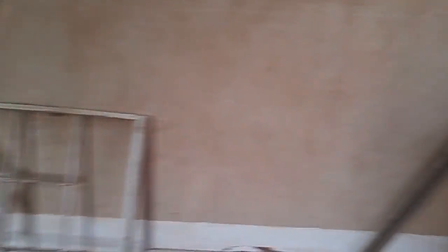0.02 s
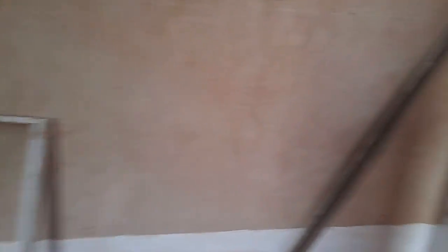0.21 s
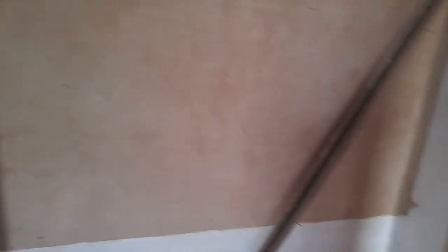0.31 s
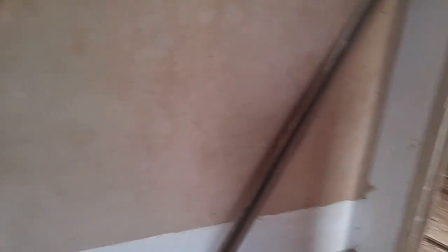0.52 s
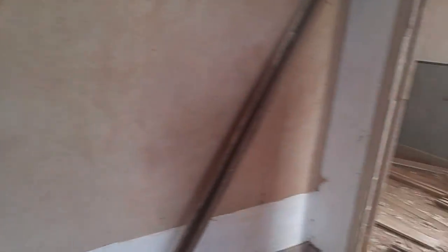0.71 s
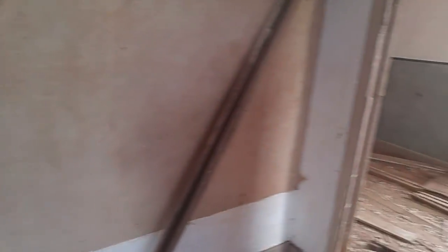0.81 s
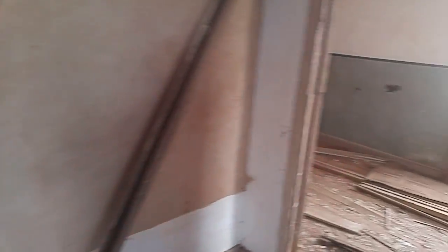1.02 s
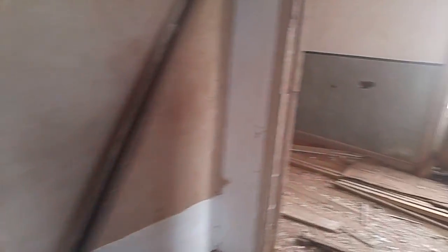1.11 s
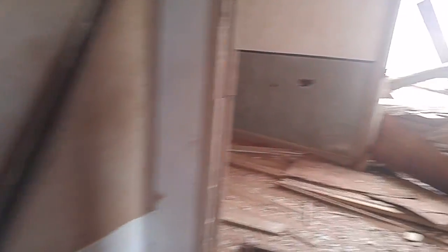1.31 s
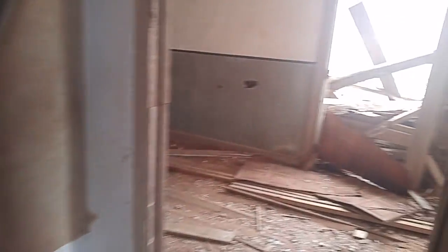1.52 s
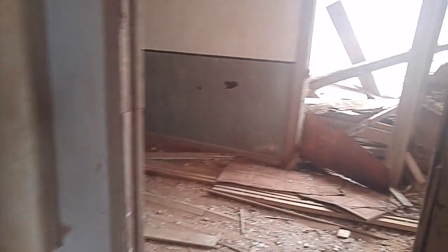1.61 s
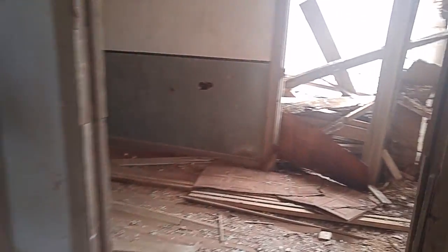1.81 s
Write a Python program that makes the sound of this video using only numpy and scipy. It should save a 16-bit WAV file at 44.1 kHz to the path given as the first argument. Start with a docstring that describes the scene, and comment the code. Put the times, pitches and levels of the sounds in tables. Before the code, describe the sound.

Two footsteps on loose boards and crumbled plaster: first a loud wooden clatter with sharp crunches, then sparse grit ticks, then a softer, duller step, in a bare echoing room, close hand-held stereo microphone.

```python
"""Two footsteps in a ruined room

Two steps on plaster rubble and loose boards in a bare room, heard by a hand-held camera.
Boards knock and rattle (decaying tones), plaster crunches (dense clicks) and snaps (noise bursts),
joists thud (resonated noise and low tones). Between the steps a few bits of grit crack as the foot
lifts. Bare walls ring after boards, crunch and snaps (sparse decaying taps); still air lies beneath."""
import sys
import numpy as np
from scipy import signal
from scipy.fft import rfft, irfft
from scipy.io import wavfile
from scipy.ndimage import uniform_filter1d

SR = 44100
rng = np.random.default_rng(int(sys.argv[2]) if len(sys.argv) > 2 else 0)


def nominal_scale(level):
    """Amplitude ratio for a level in decibels (scalar or array-like)."""
    x = np.asarray(level, float) / 20
    return 10 ** x


def materialize(psi):
    """Save the field psi as 16-bit PCM at rate SR to the path in sys.argv[1].

    A 1-D psi becomes a single channel; in a 2-D psi each row is a channel.
    """
    bounded = np.clip(np.atleast_2d(psi).T, -1, 1)
    quanta = np.round(bounded * 32767).astype(np.int16)
    wavfile.write(sys.argv[1], SR, quanta)


N = 83790
T = np.arange(N) / SR


def evened(x):
    """Scale to rms 1."""
    return x / np.sqrt(np.mean(x ** 2) + 1e-20)


def read(points, hz):
    """Interpolate (frequency, value) points over log frequency."""
    f, value = np.transpose(points)
    return np.interp(np.log(hz + 1), np.log(f + 1), value)


def curve(table, column):
    """One column of a table over time."""
    rows = np.array(table)
    return np.interp(T, rows[:, 0], rows[:, column])


def colour(x, points):
    """Causal minimum-phase filter with the given gain curve."""
    gain_db = read(points, np.abs(np.fft.fftfreq(4096, 1 / SR)))
    log_gain = np.log(nominal_scale(np.maximum(gain_db, -100)))
    phase = -signal.hilbert(log_gain).imag
    taps = np.fft.ifft(np.exp(log_gain + 1j * phase)).real[:2048]
    taps = taps.reshape((1,) * (x.ndim - 1) + (-1,))
    return signal.oaconvolve(x, taps, axes=-1)[..., :N]


def resonate(x, hz, width_hz):
    """One-pole complex resonator: a single damped mode."""
    r = np.exp(-np.pi * width_hz / SR)
    turn = np.exp(2j * np.pi * hz / SR)
    return 2 * signal.lfilter([1 - r], [1, -r * turn], x + 0j).real


def ring(hz, t60_s, lag_s):
    """Short decaying tone of energy 1, reaching the two ports with a lag."""
    t = np.maximum(T[:4000] - np.maximum([[lag_s], [-lag_s]], 0), 0)
    rise = np.minimum(t * hz, 1)
    out = nominal_scale(-60 * t / t60_s) * np.sin(2 * np.pi * hz * t) * rise
    return out / np.linalg.norm(out[0])


def clicks(per_s, spread_db, shape):
    """Sparse clicks of random sign, a few of them large."""
    size_db = spread_db * np.minimum(rng.exponential(1, shape), 4)
    size = nominal_scale(size_db) * rng.choice([-1., 1.], shape)
    return evened(size * (rng.random(shape) < per_s / SR))


# decay of the wall ring: (frequency [Hz], t60 [s])
WALL_DECAY = [(100, 0.52), (400, 0.43), (1000, 0.4), (3000, 0.42), (8000, 0.26), (14000, 0.25)]
# likeness of the ring at both ports: (frequency [Hz], likeness [0..1])
WALL_LIKENESS = [(100, 0.62), (500, 1), (1000, 0.2), (2000, 0.084), (8000, 0.088)]


def tail():
    """Wall echoes: sparse taps of random sign, each band dying at its own speed."""
    taps = np.zeros((2, SR))
    at = np.arange(200, SR - 20, 20) + rng.integers(0, 20, (2, (SR - 201) // 20))
    np.put_along_axis(taps, at, rng.choice([-1., 1.], at.shape), 1)
    hz, t, z = signal.stft(taps, SR, nperseg=256)
    like = np.clip(read(WALL_LIKENESS, hz), 0, 1)[:, None]
    z[1] = like * z[0] + np.sqrt(1 - like ** 2) * z[1]
    decay = nominal_scale(-60 * t / read(WALL_DECAY, hz)[:, None])
    out = signal.istft(z * decay, SR, nperseg=256)[1][:, :SR // 2]
    out[:, :200] = 0
    return out / np.linalg.norm(out[0])


def room(x, wet_db):
    """Direct sound plus wall ring; the mix of two tails turns at 7 Hz, a new spot for each sound."""
    x = x * np.ones((2, 1))
    turn = 2 * np.pi * 7 * T
    weights = (np.sin(turn), np.cos(turn))
    wet = sum(signal.fftconvolve(x * w, tail(), axes=1)[:, :N] for w in weights)
    return x + nominal_scale(wet_db) * wet


# colour of the still air: (frequency [Hz], relative level [dB])
AIR_COLOUR = [(24, -41), (40, -11), (71, -6.5), (99, 0), (256, -16), (392, -7.5), (516, -24), (600, -10),
              (715, -5.5), (942, -14), (1150, -13.5), (1590, -28), (1720, -38), (2910, -40), (6650, -44),
              (8340, -31), (16000, -41)]
# left-right likeness of the air: (frequency [Hz], likeness [-1..1])
AIR_LIKENESS = [(60, 0.76), (180, 0.89), (550, 0.78), (1650, 0), (4970, -0.0), (15000, 0.01)]
AIR_DB, AIR_PATCH_DB = -60, 0.81


def air():
    """Still air of the ruin: steady faint coloured noise with slight patches in time and frequency."""
    frames, hz = N // 512 + 6, np.fft.rfftfreq(2048, 1 / SR)
    a, b, c, d, patches = rng.standard_normal((frames, 1025, 5)).T
    patches = evened(uniform_filter1d(uniform_filter1d(patches, 20, 0), 6, 1))
    same = np.clip(read(AIR_LIKENESS, hz), -1, 1)[:, None]
    left = a + 1j * b
    right = same * left + np.sqrt(1 - same ** 2) * (c + 1j * d)
    z = np.array([left, right]) * nominal_scale(read(AIR_COLOUR, hz)[:, None] + AIR_PATCH_DB * patches)
    noise = signal.istft(z, nperseg=2048, noverlap=1536)[1][:, 1024:N + 1024]
    return nominal_scale(AIR_DB) * evened(noise)


# rumble of joists and planks: (time [s], relative joist level [dB], relative plank level [dB])
RUMBLE = [(0.0, -83, -84), (0.164, -74, -75), (0.322, -41, -33.5), (0.39, -45, -58.5), (0.412, -54, -52),
          (0.476, -56, -55), (0.512, -53, -64), (0.57, -56, -43), (0.602, -46, -39.5), (0.65, -53.5, -58.5),
          (0.718, -50.5, -57.5), (0.798, -54, -48.5), (0.836, -83, -55), (0.894, -50, -53),
          (1.036, -67, -68), (1.168, -60, -61), (1.206, -52.5, -54.5), (1.38, -61, -75), (1.45, -78, -73),
          (1.508, -45, -36.5), (1.534, -41, -38.5), (1.592, -49, -39.5), (1.83, -48, -61.5),
          (1.9, -77, -68)]
JOIST_HZ, JOIST_WIDTH_HZ, PLANK_HZ, PLANK_WIDTH_HZ = 52, 11.4, 134, 172
# low thumps of the floor: (time [s], level before rise and decay [dB], frequency [Hz], t60 [s])
FLOOR_THUMPS = [(.262, -45, 100, .15), (.305, -37, 52, 0.33), (.31, -43, 150, .1), (.355, -40, 55.5, 0.27),
                (.575, -41.5, 150, .12), (.595, -43, 50, .3), (.60, -46, 110, .1), (.70, -51, 50, .3),
                (.785, -47, 100, .1), (.89, -52, 58, .2), (1.155, -56, 50, .2), (1.192, -46, 100, 0.18),
                (1.25, -56, 55, 0.23), (1.497, -36, 69.6, 0.24), (1.51, -42, 130, .12),
                (1.575, -45, 110, 0.13), (1.625, -38, 60, 0.26), (1.72, -42, 48, 0.34), (1.81, -49, 52, .2)]
THUMP_RISE_CYCLES = 1


def thuds():
    """Body weight pushing joists and planks: resonated noise plus single decaying low tones."""
    a, b = rng.standard_normal((2, N))
    joist = resonate(resonate(a, JOIST_HZ, JOIST_WIDTH_HZ), JOIST_HZ, JOIST_WIDTH_HZ)
    plank = resonate(resonate(b, PLANK_HZ, PLANK_WIDTH_HZ), PLANK_HZ, PLANK_WIDTH_HZ)
    out = evened(joist) * nominal_scale(curve(RUMBLE, 1) - 4)
    out += evened(plank) * nominal_scale(curve(RUMBLE, 2) - 2)
    for s, level_db, hz, t60_s in FLOOR_THUMPS:
        t = np.maximum(T - s, 0)
        rise = np.minimum(t * hz / THUMP_RISE_CYCLES, 1)
        out += nominal_scale(level_db - 60 * t / t60_s) * rise * np.sin(2 * np.pi * hz * t)
    return out


# crunch of fine plaster under the sole: (time [s], relative level [dB])
CRUNCH_LEVEL = [(0.225, -75), (0.257, -33), (0.285, -37), (0.299, -27), (0.405, -43), (0.419, -45),
                (0.461, -56), (0.467, -21.5), (0.513, -51.5), (0.573, -40.5), (0.593, -36), (0.625, -45),
                (0.685, -44), (0.699, -44), (0.737, -48), (1.035, -68), (1.045, -41), (1.119, -78),
                (1.157, -49.5), (1.165, -44), (1.193, -54), (1.333, -85), (1.497, -50), (1.525, -36.5),
                (1.557, -50), (1.581, -36), (1.819, -74.5), (1.829, -53), (1.871, -94), (1.9, -72)]
# colour of grit, also of bright snaps: (frequency [Hz], relative level [dB])
GRIT_COLOUR = [(880, -37.5), (1500, -9), (1740, -3), (2690, -12.5), (4460, -11.5), (5710, -8), (6760, -8.5),
               (8490, -1.5), (10000, -7), (10800, -10), (12400, -14.5), (15200, -22), (16000, -18)]
GRAINS_PER_S, GRAIN_SPREAD_DB, GRIT_WET_DB = 5600, 2.5, -0.5


def crunch():
    """Fine plaster crushed left and right of the sole: dense tiny grains as coloured clicks."""
    grains = clicks(GRAINS_PER_S, GRAIN_SPREAD_DB, (2, N))
    grains = evened(colour(grains + 0.1 * grains[::-1], GRIT_COLOUR))
    return room(grains * nominal_scale(curve(CRUNCH_LEVEL, 1) - 3.5), GRIT_WET_DB)


# plaster snaps: (time [s], relative level [dB], dull part re bright [dB],
# left minus right, held within 8 [dB], t60 [s], favoured pitch [Hz], rise [s])
PLASTER_SNAPS = [(0.2585, -25, -21, -1, 0.018, 3140, 0.0011), (0.2642, -22.5, 11, -1, 0.025, 6400, 0.0013),
                 (0.2895, -23, -19, 0, 0.018, 7340, 0.0011), (0.298, -15, -7, -8, 0.031, 7170, 0.0011),
                 (0.3053, -10, -31, -0.5, 0.016, 7400, 0.00073),
                 (0.4155, -20, -23, -19.5, 0.025, 5370, 0.001),
                 (0.4197, -10.5, -19, 17, 0.018, 6200, 0.0015),
                 (0.4246, -16, -3.5, -12, 0.023, 5900, 0.0015), (0.4364, -52, -15, 6, 0.018, 7380, 0.001),
                 (0.467, -11, -39, -7.5, 0.018, 7370, 0.0008),
                 (0.4734, -15.5, -50, 15, 0.016, 5200, 0.00079), (0.4834, -31, -9, 0, 0.018, 7210, 0.001),
                 (0.4954, -29, -29, 8, 0.016, 7560, 0.001), (0.5863, -23, -27, 11, 0.017, 6470, 0.0012),
                 (0.5897, -25, -29, -11, 0.023, 5530, 0.0012), (0.668, -31, -5, -4, 0.018, 7380, 0.001),
                 (0.6949, -22.5, -6, -3, 0.018, 5560, 0.00079), (0.7007, -31, -8, 11, 0.016, 4870, 0.00072),
                 (0.7092, -29, -16, 8, 0.02, 5500, 0.0011), (0.7208, -29.5, 2, 0, 0.017, 5660, 0.00085),
                 (0.7797, -31, -15, -3, 0.021, 3360, 0.001), (0.8594, -43, 13.5, 4, 0.017, 3040, 0.001),
                 (0.9194, -44.5, 5, -5, 0.028, 3000, 0.0014), (1.0418, -32.5, -41, 0, 0.016, 4150, 0.00091),
                 (1.0471, -31, -30, 2, 0.018, 4220, 0.00088),
                 (1.0912, -50.5, 21.5, 5, 0.018, 3120, 0.00082),
                 (1.099, -53, 17, -15, 0.012, 3380, 0.00064), (1.1463, -42, -27, -2, 0.014, 7420, 0.001),
                 (1.1598, -33.5, -16, -10, 0.016, 7100, 0.00091),
                 (1.1659, -26.5, -11, -3, 0.016, 7350, 0.00096),
                 (1.2646, -41.5, 6.5, -5.5, 0.016, 4470, 0.00076), (1.2687, -40, -3, 3, 0.019, 5860, 0.001),
                 (1.3663, -43.5, -11, 0, 0.02, 3230, 0.0011),
                 (1.4152, -41.5, -7, -3.5, 0.024, 7300, 0.0011),
                 (1.4728, -41.5, -19, -4, 0.018, 6670, 0.001), (1.51, -33, 1, -5, 0.018, 3180, 0.001),
                 (1.5233, -30, 3, -5, 0.018, 5310, 0.00091), (1.53, -30, 0, 8, 0.017, 7200, 0.00089),
                 (1.5806, -26, 5, -5, 0.018, 7270, 0.0012), (1.5877, -29, -1, 1, 0.02, 3340, 0.001),
                 (1.6065, -27, -8, -1, 0.018, 7490, 0.001), (1.6127, -35, -7, 3, 0.018, 7420, 0.00092),
                 (1.6594, -43.5, 5, -11, 0.018, 4710, 0.0013), (1.7144, -59, -8, 11, 0.018, 7270, 0.001),
                 (1.8271, -40, -5, -13, 0.023, 4520, 0.0025), (1.8324, -51, -21, -1, 0.024, 6150, 0.001)]
# colour of the dull part: (frequency [Hz], relative level [dB])
DULL_COLOUR = [(700, -15.5), (1100, 12), (1800, 10), (2400, 11.5), (3200, -14), (5000, -27)]
SNAP_TONE_DB, SNAP_WIDTH_HZ, SNAP_WET_DB = 6, 1200, -7


def snaps():
    """Plaster breaking: sudden noise bursts, each a resonant bright part and a dull part."""
    bright, dull = np.zeros((2, 2, N + 2000))
    t = T[:2000]
    noise = rng.standard_normal((len(PLASTER_SNAPS), 3, 2000))
    for (s, level_db, dull_db, pan_db, t60_s, hz, rise_s), z in zip(PLASTER_SNAPS, noise):
        at = round(s * SR)
        side_db = np.clip(pan_db, -8, 8) * np.array([[.5], [-.5]])
        shape = nominal_scale(level_db - 6.5 - 60 * t / t60_s + side_db) * np.minimum(t / rise_s, 1)
        burst = 0.87 * z[0] + 0.89 * z[1:]  # part shared, part per port
        tone = nominal_scale(SNAP_TONE_DB) * resonate(burst, hz, SNAP_WIDTH_HZ)
        bright[:, at:at + 2000] += shape * (burst + tone)
        dull[:, at:at + 2000] += shape * nominal_scale(dull_db) * (0.94 * z[1] + 0.7 * z[::2])
    unit = np.zeros(N)
    unit[0] = 1
    parts = [colour(x, c) / np.linalg.norm(colour(unit, c))  # filters of energy 1
             for x, c in ((bright, GRIT_COLOUR), (dull, DULL_COLOUR))]
    return room(sum(parts), SNAP_WET_DB)


# rattle of loose boards: (time [s], relative level of low, middle, high boards [dB])
BOARD_RATTLE = [(0.22, -70, -82, -74), (0.228, -65, -80, -62), (0.238, -20, -40, -50.5),
                (0.252, -22, -17, -24.5), (0.27, -16, -23.5, -28.5), (0.284, -35, -29.5, -39),
                (0.318, -29.5, -29.5, -41), (0.406, -35, -37.5, -51), (0.424, -28.5, -38, -37.5),
                (0.458, -31.5, -48.5, -43), (0.468, -48, -27, -30.5), (0.524, -42, -39, -42.5),
                (0.58, -31.5, -30, -36), (0.702, -43, -51.5, -63), (0.724, -39.5, -28.5, -49),
                (0.758, -28.5, -45.5, -50.5), (0.78, -44, -35, -35.5), (0.828, -49, -48, -57.5),
                (0.888, -40.5, -43.5, -45), (1.028, -54, -54.5, -83), (1.042, -56, -53.5, -57),
                (1.394, -64.5, -66, -64.5), (1.492, -50, -51, -58), (1.506, -27.5, -30, -40),
                (1.53, -27, -22, -32), (1.558, -25, -31.5, -33.5), (1.586, -38.5, -26, -29.5),
                (1.622, -37, -32, -50), (1.856, -58, -71, -75), (1.9, -73, -90, -81)]
# ranges of ringing bits of board: (lowest [Hz], highest [Hz], t60 [s])
BIT_RANGES = [(285.2, 457, 0.048), (586, 1046, 0.039), (1132, 2314, 0.01), (2426, 4100, 0.011)]
# knocks: (time [s], relative low mode level [dB], low mode [Hz],
# relative upper mode level [dB], upper mode [Hz])
BOARD_KNOCKS = [(0.24, -16.5, 377, -28, 707), (0.25, -12, 458, -18.5, 566), (0.257, -15, 404, -16, 667),
                (0.268, -18.5, 453, -12.5, 662.5), (0.282, -14.5, 362, -29, 580),
                (0.307, -23, 419, -29, 595), (0.344, -29, 325, -25, 684), (0.42, -26, 340.6, -32, 880),
                (0.467, -35.5, 441, -32, 615), (0.537, -39, 344, -25.5, 633), (0.571, -16.5, 354, -18, 813),
                (0.58, -20.5, 405, -23.5, 640), (0.6, -23.5, 396, -43, 659), (0.621, -30.5, 416, -31, 612),
                (0.644, -32.5, 410, -32.5, 1067), (0.714, -38, 340, -30.5, 720),
                (0.772, -27.5, 354, -35, 786), (0.863, -31.5, 365, -44.5, 677), (1.445, -56, 395, -53, 870),
                (1.49, -26, 274, -45, 1120), (1.504, -33, 326, -37, 688), (1.511, -30, 352, -27, 914),
                (1.526, -22, 279, -21.5, 603), (1.544, -28, 383, -25, 619), (1.574, -32, 285, -22.5, 762),
                (1.588, -23, 433, -24, 748), (1.62, -41, 435, -23.5, 669), (1.654, -40, 348, -32.5, 682),
                (1.7, -31, 342, -43, 623)]
# colour of the wood as it reaches the camera: (frequency [Hz], gain [dB])
WOOD_COLOUR = [(120, -40), (230, -9), (320, -4), (430, -1), (510, -12.5), (620, 0), (700, -0.5),
               (900, -2.5), (1200, -2), (2300, -2), (3500, -4.5), (6000, -17)]
RATTLES_PER_S, RATTLE_SPREAD_DB = 700, 3.0
UPPER_BITS_DB = -6  # the smallest bits follow the high boards, quieter
SPOT_LAG_S = 0.00026  # spread of left-right lag over the spots
BOARD_WET_DB = -3.5


def boards():
    """Loose boards: random taps each ring one bit; a firm knock rings a low and an upper mode."""
    out, count = np.zeros((2, N + 4000)), 8
    lags_s = SPOT_LAG_S * rng.uniform(-1.05, 1, (len(BOARD_KNOCKS) + 4, count))
    for k, (low_hz, high_hz, t60_s) in enumerate(BIT_RANGES):
        level_db = curve(BOARD_RATTLE, min(k + 1, 3)) - 12 + UPPER_BITS_DB * (k == 3)
        taps = clicks(RATTLES_PER_S / count, RATTLE_SPREAD_DB, (count, 1, N)) * nominal_scale(level_db)
        pitches_hz = np.geomspace(low_hz, high_hz, count)
        rings = np.array([ring(hz, t60_s, lag) for hz, lag in zip(pitches_hz, lags_s[k])])
        out[:, :N] += signal.fftconvolve(taps, rings, axes=2)[..., :N].sum(0)
    for (s, low_db, low_hz, upper_db, upper_hz), lag in zip(BOARD_KNOCKS, lags_s[4:, 0]):
        at = round(s * SR)
        low = nominal_scale(low_db + 20.5) * ring(low_hz, 0.064, lag)
        upper = nominal_scale(upper_db + 21.5) * ring(upper_hz, 0.067, lag)
        out[:, at:at + 4000] -= low + upper
    return room(colour(out, WOOD_COLOUR), BOARD_WET_DB)


FADE_FROM_S, FADE_DB_PER_S = 1.864, -150


def scene():
    """Sum of all layers, fading together in the last moment."""
    fade = nominal_scale(FADE_DB_PER_S * np.maximum(T - FADE_FROM_S, 0))
    return fade * (boards() + crunch() + snaps() + thuds() + air())


def top_cut(x):
    """Nothing passes above the cut-off."""
    return signal.sosfilt(signal.butter(12, 16650, fs=SR, output="sos"), x)


# microphone ports: (frequency [Hz], left minus right [dB])
PORT_COLOUR = [(60, -1), (300, -1), (700, -1.5), (1200, -1), (2500, .5), (4000, 0.5), (6000, 2),
               (7300, 4.5), (8000, 4), (8700, -14), (9600, -2.5), (11000, -3), (13000, -0.5), (15500, 0)]
PORT_LAG_S, LOW_CUT_HZ, EDGE_HZ = .00007, 41, 15900


def record(dry):
    """Camera: two ports of unequal colour and small lag, band limits, soft-clipping input."""
    hz = np.fft.rfftfreq(N, 1 / SR)
    half = np.array([[.5], [-.5]])
    lag = np.exp(-2j * np.pi * hz * half * PORT_LAG_S)
    x = irfft(rfft(dry) * nominal_scale(half * read(PORT_COLOUR, hz)) * lag, N)
    x = signal.sosfilt(signal.butter(4, LOW_CUT_HZ, "high", fs=SR, output="sos"), x)
    low_pass = signal.firwin(255, EDGE_HZ, window=("kaiser", 4), fs=SR)
    x = signal.oaconvolve(x, low_pass[None], "same")
    x = np.tanh(x)  # the input stage rounds the highest peaks
    return top_cut(x)


dry = scene()
out = record(dry)
materialize(out)
```